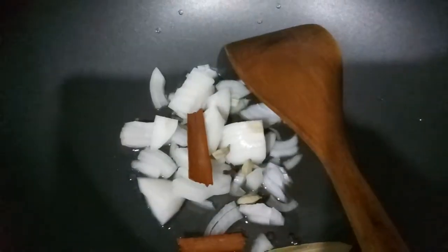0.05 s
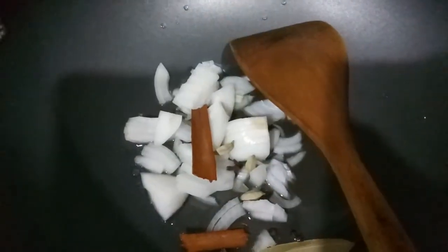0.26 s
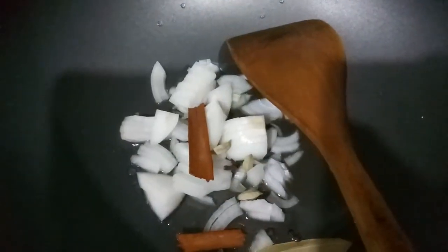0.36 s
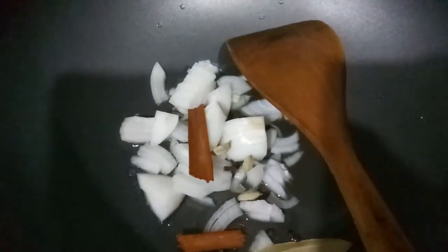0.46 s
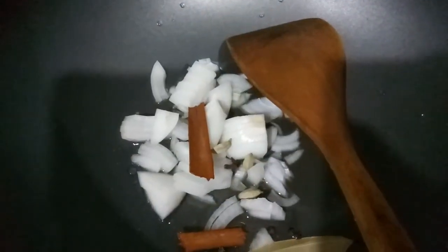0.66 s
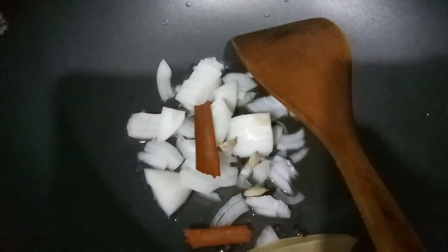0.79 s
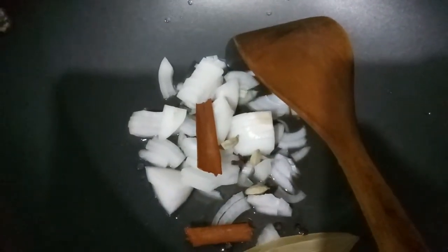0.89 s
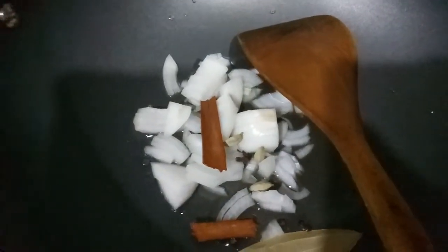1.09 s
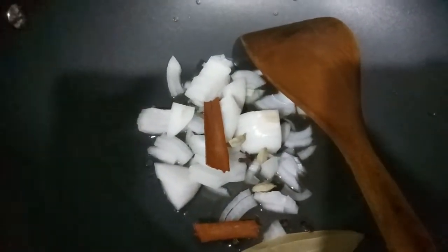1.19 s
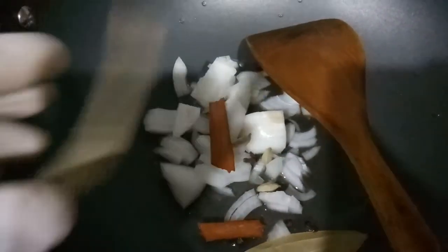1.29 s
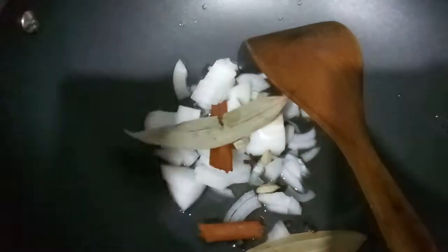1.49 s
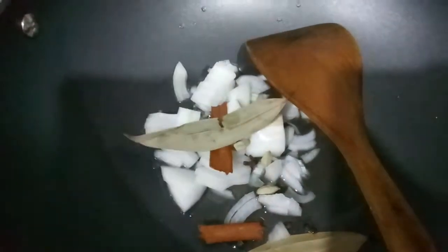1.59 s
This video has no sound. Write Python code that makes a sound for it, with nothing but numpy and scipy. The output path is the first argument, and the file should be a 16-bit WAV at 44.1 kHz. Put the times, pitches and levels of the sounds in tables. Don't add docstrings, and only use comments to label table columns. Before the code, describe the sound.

Close up in a hard-walled kitchen, two quick loud bowl clacks overload the microphone and duck the level; the room tail swells back over low hum, then brittle rustling, tiny snaps and a papery leaf tap.

```python
import sys
import numpy as np
from scipy import signal
from scipy.fft import rfft, irfft
from scipy.io import wavfile

SR = 44100
rng = np.random.default_rng(int(sys.argv[2]) if len(sys.argv) > 2 else 0)


def amplitude_ratio(level_db):
    exponent = np.asarray(level_db, float) / 20
    return 10 ** exponent


def inscribe(sig):
    pcm = np.round(np.clip(np.atleast_2d(sig).T, -1, 1) * 32767)
    wavfile.write(sys.argv[1], SR, pcm.astype(np.int16))


N = 72765

# start_s, peak_db, high_modes_db, thud_db, left_right_db
CONTACTS = [
    (0.235, -0.5, 4.5, 7.5, -2.5),
    (0.2428, 0.5, -10.5, -5, 11),
    (.3505, 12.5, -11.5, 1, -4.5),
    (0.358, 15, -30.5, -5.5, 5),
]
# pitch_hz, level_db, t60_s, left_right_db
BOWL_MODES = [(1671, -15.5, 0.057, -4.5), (2081, -35, 0.032, -7), (3642, -29, .07, 27),
              (3809, -2.5, 0.08, 3), (3945, -19.5, 0.27, -7.5), (4020, -22.5, 0.053, 7.5),
              (6734, -14.5, 0.02, -18.5), (6955, -8, 0.11, -5.5), (10360, -36.5, .15, -5),
              (11740, -41, .05, -13), (12800, -42.5, .06, 1.5), (13990, -40.5, 0.068, -2.5)]
# pitch_hz, level_db, t60_s
PAN_MODES = [(109.6, -25.5, .03), (224.6, -25, 0.093), (368, -21.5, 0.017), (512, -26, 0.033),
             (822, -21, .02), (1264, -18.5, 0.021)]
# pitch_hz, density_db_per_hz
CRACK_TONE = [(100, -12), (600, -14), (1100, -5), (2000, -3), (3300, -11.5), (5400, -25.5), (6600, -15.5),
              (8500, -40)]
HIGH_MODE_HZ, CONTACT_S = 5000, 0.0098
CRACK_DB, CRACK_S, CRACK_FRONT_DB = 7, 0.0023, 12
GRAZE_S, GRAZE_HZ, GRAZE_DB, GRAZE_T60_S, GRAZE_LEFT_RIGHT_DB = .2228, 7500, -25.5, 0.022, -21.5

# start_s, level_db
RUSTLE_LEVEL = [(0.621, -55.5), (.84, -61), (.87, -45.5), (.93, -48), (0.962, -33.5), (1.032, -40.5),
                (1.091, -52), (1.14, -56), (1.258, -53), (1.33, -44.5), (1.39, -48), (1.46, -67),
                (1.498, -62), (1.56, -70.5), (1.65, -72)]
# pitch_hz, density_db_per_hz
RUSTLE_TONE = [(880, -53), (1500, -13), (2150, -5.5), (2330, -6), (3990, -6.5), (6620, -10), (9790, -25),
               (15500, -34.5)]
CRACKLES_PER_S, RUSTLE_DB, CRACKLE_SPREAD_DB = 3800, -7.5, 1.5
# start_s, peak_db, length_s
POD_SNAPS = [
    (.948, -63, 0.0026),
    (.9635, -26, .002),
    (.978, -32, 0.0026),
    (1.0128, -35.5, 0.0044),
]
# start_s, peak_db, length_s
EDGE_TICKS = [
    (.8657, -45, .004),
    (1.078, -47, .005),
    (1.174, -48, .003),
]
# pitch_hz, density_db_per_hz
EDGE_TONE = [(3000, -30), (5500, 0), (7500, -2), (10000, -14), (15000, -22)]
# start_s, peak_db, length_s
LEAF_DROP = [
    (1.4848, -20.5, 0.0023),
    (1.493, -33, 0.0038),
    (1.5015, -31.5, 0.0045),
    (1.505, -17, 0.0013),
    (1.5075, -14, 0.0027),
    (1.5145, -26, 0.0021),
    (1.519, -32, 0.0014),
    (1.526, -30, 0.0023),
    (1.537, -35.5, .004),
    (1.553, -47, 0.00207),
]
# pitch_hz, density_db_per_hz
LEAF_TONE = [(300, -25), (1500, -16), (2870, -4), (4350, -0.5), (5360, -11), (6850, -6), (8400, -18.5),
             (15500, -35.5)]

# pitch_hz, t60_s
ROOM_T60 = [(100, 0.66), (400, 0.46), (1500, 0.44), (4000, 0.39), (7000, 0.44), (12000, .35)]
# pitch_hz, level_db
ROOM_TONE = [(100, 2.5), (400, 1.5), (1500, 5), (4000, 1.5), (5500, -4), (6800, -2), (8800, -13),
             (13000, -6.5)]
ROOM_DB, ROOM_RISE_S, LEAF_ROOM_DB = -26, 0.0027, -40

# pitch_hz, density_db_per_hz
AIR_TONE = [(25, -26), (84, -5), (368, -13.5), (495, -21), (2060, -20.5), (4500, -24), (7500, -21.5),
            (10500, -41.5)]
# pitch_hz, width_hz, rms_db, left_right_likeness, flame_share
HUM_BANDS = [(89, 14, -62, .3, 0.1093), (359, 60, -56, 1, 1), (750, 60, -74, 0.98, .1),
             (1348, 50, -59.5, .5, .1), (2740, 150, -64, .5, .1), (3800, 390, -60.5, .5, 0.092),
             (4500, 300, -54, 0.38, 0.11), (6400, 300, -67.5, .5, .1), (14800, 1600, -74.5, .3, 0.11)]
# time_s, level_db
FLAME_SWELL = [(0, 2.5), (.2, 2.5), (.85, -2.5), (.95, -15), (1.0, 4), (1.15, -2), (1.2, -8.5), (1.45, -4),
               (1.65, -0.5)]
AIR_DB = -58.5
MOTOR_HZ, MOTOR_DB, MOTOR_WAVER_DB = 96.5, -60, 1.5

# pitch_hz, left_right_db
PORT_BALANCE = [(60, 0.5), (200, 4), (700, 9.5), (1650, 4.5), (3850, 10.5), (5000, 7.5), (7000, 2.5),
                (15000, 7)]
# time_s, gain_db
GAIN_CONTROL = [(0.244, -5.5), (0.261, -15.5), (0.312, -10.5), (0.346, -12.5), (0.365, -18.5), (0.38, -27),
                (0.471, -12), (.57, -10.5), (.7, -4)]
LEFT_LAG_SAMPLES, CLIP_HARDNESS, CUTOFF_HZ = 20, 12, 15400


def rms_one(x):
    return x / np.sqrt(np.mean(x ** 2) + 1e-20)


def at_hz(points, hz):
    table = np.array(points)
    return np.interp(np.log(hz + 1e-9), np.log(table[:, 0]), table[:, 1])


def colour(x, points):
    size = 2048
    log_gain = at_hz(points, np.fft.rfftfreq(size, 1 / SR)) * np.log(10) / 20
    cepstrum = irfft(log_gain)
    cepstrum[1:size // 2] *= 2
    cepstrum[size // 2 + 1:] = 0
    impulse = irfft(np.exp(rfft(cepstrum)))
    impulse = impulse.reshape((1,) * (x.ndim - 1) + (-1,))
    return signal.fftconvolve(x, impulse, axes=-1)[..., :x.shape[-1]]


def drift(rate_hz):
    pole = np.exp(-80 * np.pi * rate_hz / SR)
    noise = rng.standard_normal(N // 40 + 2002)
    slow = signal.lfilter([1], [1, -2 * pole, pole * pole], noise)[2000:]
    return np.interp(np.arange(N) / 40, np.arange(len(slow)), rms_one(slow))


def ring(clicks, hz, t60):
    radius, angle = amplitude_ratio(-60 / (max(t60, .002) * SR)), 2 * np.pi * hz / SR
    poles = [1, -2 * radius * np.cos(angle), radius * radius]
    return signal.lfilter([0, np.sin(angle)], poles, clicks + 1e-18)


def struck(clicks, hz, t60, contact_s):
    return ring(clicks, hz, t60) - ring(clicks, hz, contact_s)


def sides(db):
    return amplitude_ratio(np.array([db / 2, -db / 2]))


def burst(start_s, db, length_s, noise):
    t = np.arange(N) / SR - start_s
    decay = np.exp(-np.maximum(t, 0) / max(length_s, 3e-4))
    return amplitude_ratio(db) * noise * (t >= 0) * decay


def bowl():
    start_s, peak_db, high_db, thud_db, pan_db = np.transpose(CONTACTS)
    at = (start_s * SR).astype(int)
    out = np.zeros((2, N))
    modes = []
    for hz, level_db, t60, side_db in BOWL_MODES:
        modes.append((hz, level_db + high_db * (hz > HIGH_MODE_HZ), t60, side_db))
    for hz, level_db, t60 in PAN_MODES:
        modes.append((hz, level_db + thud_db, t60, 0))
    luck = rng.normal(0, 1, (len(at), len(modes), 2))
    for k, (hz, level_db, t60, side_db) in enumerate(modes):
        strength = amplitude_ratio(peak_db + level_db + 1.3 * luck[:, k, 0])
        clicks = np.zeros((2, N))
        clicks[:, at] = strength * sides(pan_db + side_db + 4.5 * luck[:, k, 1])
        out += struck(clicks, hz, t60, min(CONTACT_S, t60 / 2))

    graze = np.zeros((2, N))
    graze[:, int(GRAZE_S * SR)] = amplitude_ratio(GRAZE_DB) * sides(GRAZE_LEFT_RIGHT_DB)
    out += struck(graze, GRAZE_HZ, GRAZE_T60_S, CONTACT_S)

    noise = rng.standard_normal(N) + .5 * rng.standard_normal((2, N))
    crack_db = peak_db + thud_db + CRACK_DB
    crack = sum(burst(s, db, CRACK_S, noise) for s, db in zip(start_s, crack_db))
    crack[:, at] += amplitude_ratio(crack_db + CRACK_FRONT_DB)
    return out + colour(crack, CRACK_TONE)


def rustle():
    start_s, level_db = np.transpose(RUSTLE_LEVEL)
    pressure_db = np.interp(np.arange(N) / SR, start_s, level_db, left=-120)
    level = amplitude_ratio(pressure_db + RUSTLE_DB + 0.83 * drift(25))
    sizes = amplitude_ratio(CRACKLE_SPREAD_DB * np.minimum(rng.exponential(1, N), 5)) * rng.choice([-1, 1], N)
    born = rng.random(N) < CRACKLES_PER_S / SR
    crackles = sizes * born * sides(rng.choice([-6, 6], N))
    return level * rms_one(colour(crackles, RUSTLE_TONE))


def leaves():
    out = rustle()
    noise = rng.standard_normal(N)
    for events, tone in ((POD_SNAPS, RUSTLE_TONE), (EDGE_TICKS, EDGE_TONE), (LEAF_DROP, LEAF_TONE)):
        bursts = sum(burst(s, db - 4, length_s, noise) for s, db, length_s in events)
        hits = colour(bursts, tone) / np.std(colour(noise, tone))
        out = out + hits * sides(3.7)[:, None]
    return out


def kitchen(x):
    t = np.arange(SR) / SR
    edges = 60 * 2 ** np.arange(0, 8.1, .5)
    white, tail = rng.standard_normal((2, 2, SR)), 0
    for k, (low, high) in enumerate(zip(edges, edges[1:])):
        band_filter = signal.butter(2, [low, high], "band", fs=SR, output="sos")
        band = signal.sosfilt(band_filter, white[k % 2])
        tail = tail + band * amplitude_ratio(-60 * t / at_hz(ROOM_T60, np.sqrt(low * high)))
    response = colour(tail, ROOM_TONE) * (1 - np.exp(-t / ROOM_RISE_S))
    return signal.fftconvolve(x[None], response, axes=-1)[:, :N]


def background():
    air = colour(rng.standard_normal((2, N + 2048)), AIR_TONE)[:, 2048:]
    out = amplitude_ratio(AIR_DB) * rms_one(air)
    t = np.arange(N) / SR
    motor_level = amplitude_ratio(MOTOR_DB + MOTOR_WAVER_DB * drift(6))
    out += motor_level * np.sin(2 * np.pi * MOTOR_HZ * t + .4 * drift(1.2))

    flame_db = np.interp(t, *np.transpose(FLAME_SWELL))
    for hz, width_hz, db, alike, flame_share in HUM_BANDS:
        radius = np.exp(-np.pi * width_hz / SR)
        poles = [1, -2 * radius * np.cos(2 * np.pi * hz / SR), radius * radius]
        band = rng.standard_normal((2, N + SR // 4))
        for _ in range(2):
            band = signal.lfilter([1, 0, -1], poles, band)
        mid, side = rms_one(band[:, SR // 4:])
        alike = np.clip(alike, -1, 1)
        stereo = np.sqrt(1 + alike) * mid + np.sqrt(1 - alike) * side * [[1], [-1]]
        out += amplitude_ratio(db + flame_share * flame_db) * stereo / np.sqrt(2)
    return out


def scene():
    knocks, crackle = bowl(), leaves()
    room = kitchen(amplitude_ratio(ROOM_DB) * knocks.mean(axis=0) + amplitude_ratio(LEAF_ROOM_DB) * crackle[0])
    return knocks + crackle + room + background()


def top_cut(x):
    return signal.sosfilt(signal.butter(12, 20000, fs=SR, output="sos"), x)


def record(dry):
    left = [(hz, db / 2) for hz, db in PORT_BALANCE]
    right = [(hz, -db / 2) for hz, db in PORT_BALANCE]
    x = np.array([colour(dry[0], left), colour(dry[1], right)])
    lag = LEFT_LAG_SAMPLES
    x = np.pad(x, [(0, 0), (lag, lag)], mode="reflect")
    x = np.array([x[0, lag // 2:][:N], x[1, 3 * lag // 2:][:N]])
    x = signal.sosfilt(signal.butter(2, 45, "high", fs=SR, output="sos"), x)
    time_s, gain_db = np.transpose(GAIN_CONTROL)
    x = x * amplitude_ratio(np.interp(np.arange(N) / SR, time_s, gain_db))
    x = x / (1 + np.abs(x) ** CLIP_HARDNESS) ** (1 / CLIP_HARDNESS)
    x = signal.sosfilt(signal.ellip(8, .5, 50, CUTOFF_HZ, fs=SR, output="sos"), x)
    return top_cut(x)


dry = scene()
out = record(dry)
inscribe(out)
```